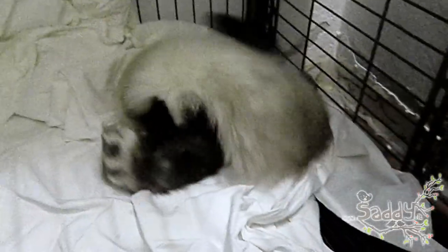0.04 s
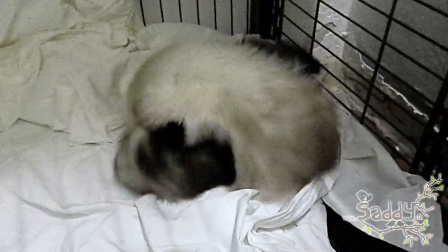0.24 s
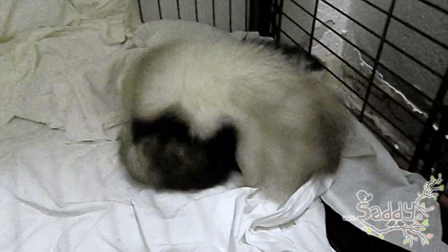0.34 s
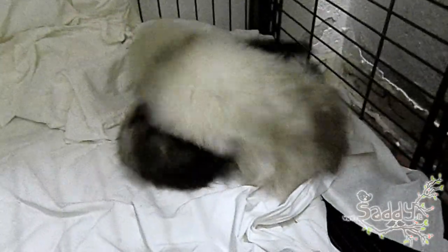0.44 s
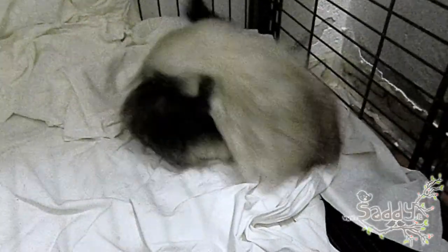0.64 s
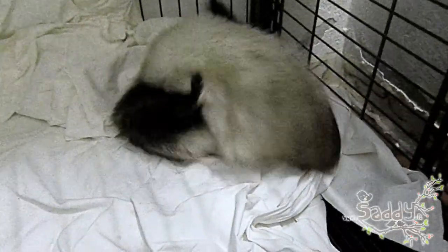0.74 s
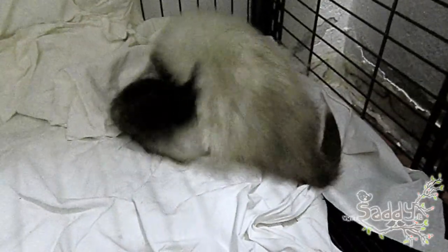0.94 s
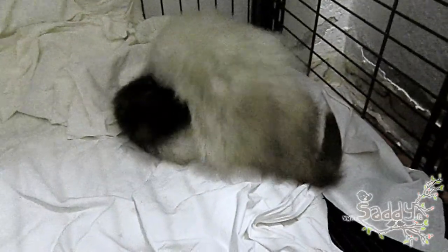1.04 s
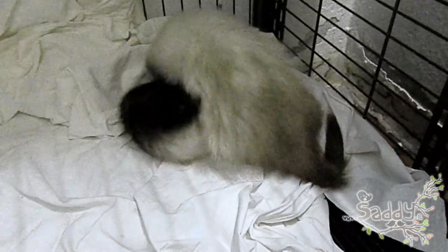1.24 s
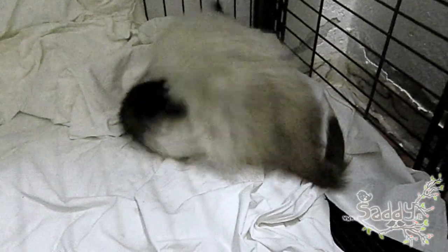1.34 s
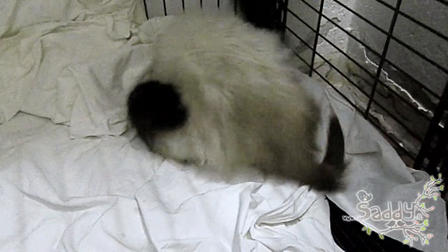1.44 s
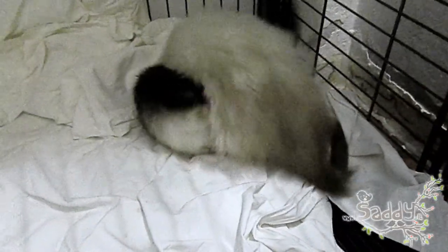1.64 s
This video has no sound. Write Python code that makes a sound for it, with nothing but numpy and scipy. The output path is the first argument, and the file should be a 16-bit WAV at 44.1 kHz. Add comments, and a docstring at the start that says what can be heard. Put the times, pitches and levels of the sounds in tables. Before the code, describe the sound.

Two brief squeaks come from ferrets wrestling in a small room: one clear and loud, the next quieter and lower. Faint rustles and soft paw bumps on the bedding sit over a low motor hum and light hiss.

```python
"""Two short ferret squeaks in a small room: a loud, nearly pure falling one, then a softer, lower,
reedier one, both made by vocal folds sounding through the throat. Two ferrets wrestle in a cage;
fur rustles faintly over the cloth bedding and paws bump it. Behind them an appliance motor hums
and throbs against the mains hum, over low rumble, hiss and a thin electrical whine."""
import sys
import numpy as np
from scipy import signal
from scipy.fft import rfft
from scipy.io import wavfile
from scipy.ndimage import uniform_filter1d

SR = 44100
rng = np.random.default_rng(int(sys.argv[2]) if len(sys.argv) > 2 else 0)


def pcm_store(signal):
    """Save signal as 16-bit PCM."""
    levels = np.round(np.clip(np.atleast_2d(signal), -1, 1) * 32767)
    wavfile.write(sys.argv[1], SR, levels.astype(np.int16).T)


N = 74970


def undb(db):
    """Decibels to gain."""
    return 10 ** (np.asarray(db) / 20)


def unit_rms(x):
    """Scale to rms 1."""
    return x / np.sqrt(np.mean(x ** 2))


def curve(t, rows):
    """Straight lines through (time_s, value) rows."""
    return np.interp(t, *np.array(rows, float).T)


def spectrum_gain(hz, rows):
    """Gain at hz from (freq_hz, level_db) rows, on a log frequency axis."""
    freq_hz, level_db = np.array(rows, float).T
    return undb(np.interp(np.log(np.maximum(hz, 1)), np.log(freq_hz), level_db))


def noise(gain_at):
    """Noise of rms 1 with spectrum gain_at(hz)."""
    bins_hz = np.arange(N // 2 + 1) * SR / N
    return unit_rms(np.fft.irfft(rfft(rng.standard_normal(N)) * gain_at(bins_hz), N))


def wander(rate_hz):
    """Smooth random motion of rms 1, up to about rate_hz."""
    return noise(lambda f: np.exp(-(f / rate_hz) ** 2))


def band_noise(centre_hz, width_hz):
    """Noise of rms 1 in one resonance."""
    return noise(lambda f: 1 / (1 + ((f - centre_hz) / width_hz * np.sqrt(2)) ** 4))


# room resonances: centre_hz, width_hz, level_db
ROOM_MODES = [(48, 31, -46.5), (106.7, 15.7, -47), (372, 81, -56.5)]
# noise floor spectrum: freq_hz, relative_density_db
FLOOR_SPECTRUM = [(20, -1.5), (70, 2), (150, -0.5), (280, 6), (410, -3), (480, -5.5), (800, -5.5),
                  (1300, -11), (2000, -15), (3000, -17.5), (5000, -23.5), (8000, -28), (15500, -33.5)]


def rumble_and_hiss(floor_db=-47.5):
    """Even hiss, with rumble gathering in the room's low resonances."""
    rumble = sum(undb(db) * band_noise(hz, width_hz) for hz, width_hz, db in ROOM_MODES)
    return rumble + undb(floor_db) * noise(lambda f: spectrum_gain(f, FLOOR_SPECTRUM))


# whine envelope: time_s, level_db
WHINE_LEVEL = [(0, -67), (.28, -71.5), (.42, -62), (.6, -64), (.75, -65), (1.1, -67.5), (1.7, -70)]


def electrical_whine(t, pitch_hz=7143.5):
    """One thin tone, drifting in level."""
    return np.sqrt(2) * undb(curve(t, WHINE_LEVEL)) * np.sin(2 * np.pi * pitch_hz * t)


# motor harmonics: shaft_multiple, level_db, waver_db
MOTOR_HARMONICS = [(3, -58.5, 4.5), (4, -60.5, 0.5), (5, -54, 0.83), (6, -44.5, 0.83), (7, -61, 1.2),
                   (12, -65.5, 4.5)]
# other steady tones: pitch_hz, level_db, waver_db
STEADY_TONES = [(53.8, -47, -4), (374.2, -56.5, -1.5), (2834, -78.5, -0.5), (2924, -77, 1.5),
                (2980, -70.5, 1), (4260, -88.5, 7.5)]


def motor_hum(t, shaft_hz=48.47, waver_hz=2.2):
    """Harmonics of the shaft rate and a few other tones, each wavering in level."""
    harmonics = [(k * shaft_hz, db, waver_db) for k, db, waver_db in MOTOR_HARMONICS]
    hum = np.zeros(N)
    for pitch_hz, level_db, waver_db in harmonics + STEADY_TONES:
        gain = undb(level_db + waver_db * wander(waver_hz))
        hum += gain * np.sin(2 * np.pi * (pitch_hz * t + rng.random()))
    return np.sqrt(2) * hum


def mains_throb(t, mains_hz=100, beat_hz=2.55, mains_db=-41.5, motor_db=-46.5, peak_s=.265):
    """Mains hum beats against the motor's second harmonic."""
    radians_per_hz = 2 * np.pi * (t - peak_s)
    mains = undb(mains_db) * np.sin(mains_hz * radians_per_hz)
    motor = undb(motor_db) * np.sin((mains_hz - beat_hz) * radians_per_hz)
    return np.sqrt(2) * (mains + motor)


# early reflections: delay_s, gain_db
REFLECTIONS = [(.012, -19), (.04, -26)]


def room(direct, t, tail_db=-19.5, gap_s=.006, t60_s=.27):
    """Direct sound, two near reflections and a short diffuse tail of even colour."""
    decay = np.exp(-np.log(1000) * t / t60_s) * (t > gap_s)
    spectrum = rfft(rng.standard_normal(N) * decay)
    smooth_magnitude = np.sqrt(uniform_filter1d(np.abs(spectrum) ** 2, size=120))
    tail = np.fft.irfft(spectrum / smooth_magnitude, N) * (t < 2 * t60_s)
    early = sum(undb(db) * np.interp(t - delay_s, t, direct) for delay_s, db in REFLECTIONS)
    return direct + early + undb(tail_db) * signal.fftconvolve(direct, tail)[:N]


def swells(t, rows):
    """Gaussian envelopes from (peak_s, half_width_s, level_db) rows."""
    return sum(undb(db) * np.exp(-2 * ((t - peak_s) / half_s) ** 2) for peak_s, half_s, db in rows)


# cloth friction spectrum: freq_hz, relative_density_db
CLOTH_SPECTRUM = [(300, 9), (800, 9.5), (1600, 2), (3000, -2), (4800, -6.5), (8000, -14), (15000, -35)]
# rustles: peak_s, half_width_s, level_db
RUSTLES = [(0.136, 0.054, -53), (0.23, 0.037, -49.5), (.295, 0.028, -54), (0.824, 0.075, -55),
           (1.155, .03, -71), (1.59, 0.027, -58)]


def bedding_rustle(t, grain_db=2.5, grain_hz=240):
    """Fur drags over cloth in short grainy swells."""
    friction = noise(lambda f: spectrum_gain(f, CLOTH_SPECTRUM))
    grain = undb(grain_db * wander(grain_hz))
    return swells(t, RUSTLES) * unit_rms(friction * grain)


# paw bumps: peak_s, half_width_s, level_db
PAW_BUMPS = [(1.08, .012, -49), (1.309, 0.014, -61)]


def paw_bumps(t):
    """Paws land softly on the bedding."""
    return swells(t, PAW_BUMPS) * band_noise(centre_hz=750, width_hz=360)


# pitch contours: time_s, pitch_hz
HIGH_PITCH = [(.360, 1068), (.364, 968), (.368, 896), (.376, 920.4), (.385, 885), (.394, 804), (.403, 810)]
LOW_PITCH = [(.659, 870), (.662, 838), (.666, 708), (.678, 696.6), (.692, 686)]
# envelopes: time_s, level_db
HIGH_LEVEL = [(.359, -58), (0.365, -22.5), (0.377, -19.5), (0.384, -16), (0.398, -22.5), (0.407, -58)]
LOW_LEVEL = [(0.6588, -54), (0.662, -24.5), (.667, -37), (0.674, -29.5), (0.683, -35), (0.69, -36.5),
             (0.699, -47)]
# throat response at full effort: overtone_hz, gain_re_fundamental_db
HIGH_THROAT = [(1000, 0), (1500, -19), (1850, -17.5), (2400, -40.5), (2720, -27.5), (3400, -36),
               (3700, -44), (4200, -51), (4480, -36), (4620, -34), (5000, -45), (5450, -42), (7300, -49),
               (12000, -67)]
LOW_THROAT = [(900, 6), (1400, -6), (1700, -17), (2100, -17.5), (2400, -39), (2800, -26), (4200, -39),
              (4800, -30), (4950, -30), (5400, -44), (9000, -60)]
# air rushing through the throat: freq_hz, relative_density_db
AIR_SPECTRUM = [(500, -4.5), (1000, -1), (3000, -6), (6000, -9), (9000, -16), (15000, -17.5)]
# squeaks: pitch_table, level_table, throat_table, slack_s, jitter_ratio, rasp_db, air_db
SQUEAKS = [(HIGH_PITCH, HIGH_LEVEL, HIGH_THROAT, 0.393, 0.0034, -43, -33.5),
           (LOW_PITCH, LOW_LEVEL, LOW_THROAT, .679, 0.0047, -33, -30)]


def squeak(t, pitch, level, throat, slack_s, jitter_ratio, rasp_db, air_db):
    """Vocal folds sound through the throat with rasp and air; overtones fade first as they slacken."""
    sounding = (t > level[0][0]) * (t < level[-1][0])
    envelope = undb(curve(t, level)) * sounding
    pitch_hz = curve(t, pitch) * (1 + jitter_ratio * wander(rate_hz=350))
    phase = 2 * np.pi * np.cumsum(pitch_hz) / SR
    tilt_db_per_octave = -421 * np.maximum(t - slack_s, 0)
    voice = np.sin(phase)
    for k in range(2, 14):
        gain = spectrum_gain(k * pitch_hz, throat) * undb(tilt_db_per_octave * np.log2(k))
        voice += gain * np.sin(k * phase)
    air = undb(air_db) * noise(lambda f: spectrum_gain(f, AIR_SPECTRUM))
    fold_pulses = 1 + .5 * np.cos(phase)
    rasp = 1 + undb(rasp_db) * wander(rate_hz=260)
    return envelope * (np.sqrt(2) * voice * rasp + air * fold_pulses)


def scene():
    """Ferrets in the room, over hum and hiss; mono."""
    t = np.arange(N) / SR
    squeaks = sum(squeak(t, *row) for row in SQUEAKS)
    ferrets = room(squeaks + bedding_rustle(t) + paw_bumps(t), t)
    background = motor_hum(t) + mains_throb(t) + electrical_whine(t) + rumble_and_hiss()
    return (ferrets + background)[None]


def record(dry):
    """Steep low-pass on the top treble."""
    cutoff_hz = 15750
    return signal.sosfilt(signal.ellip(12, .1, 90, cutoff_hz, fs=SR, output="sos"), dry)


dry = scene()
out = record(dry)
pcm_store(out)
```